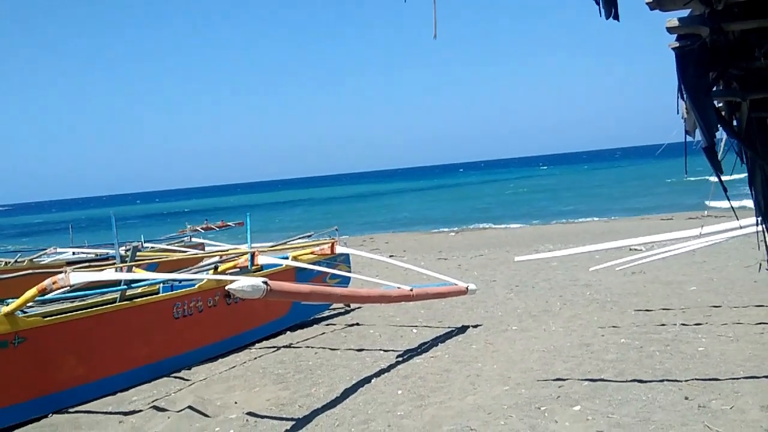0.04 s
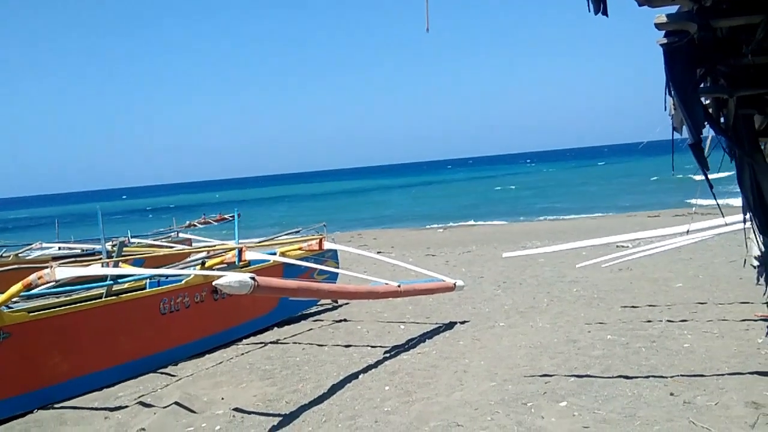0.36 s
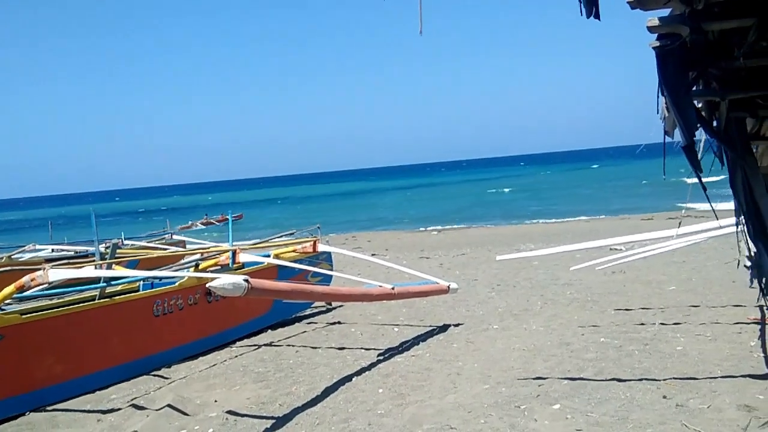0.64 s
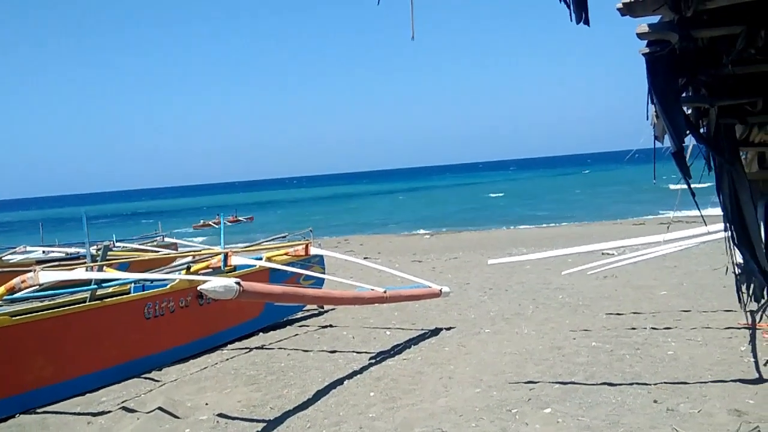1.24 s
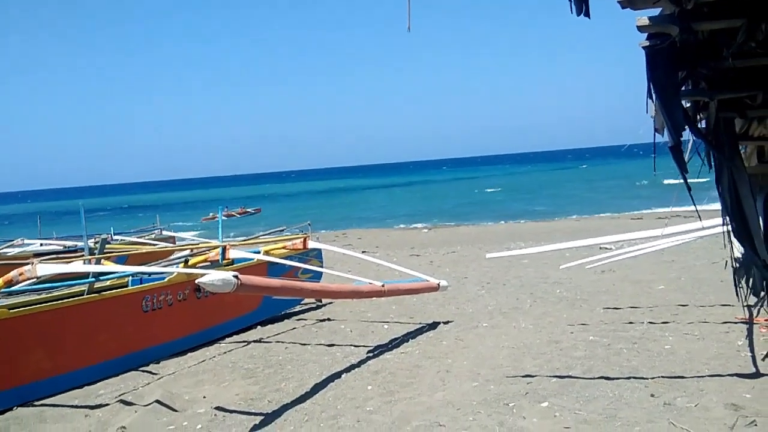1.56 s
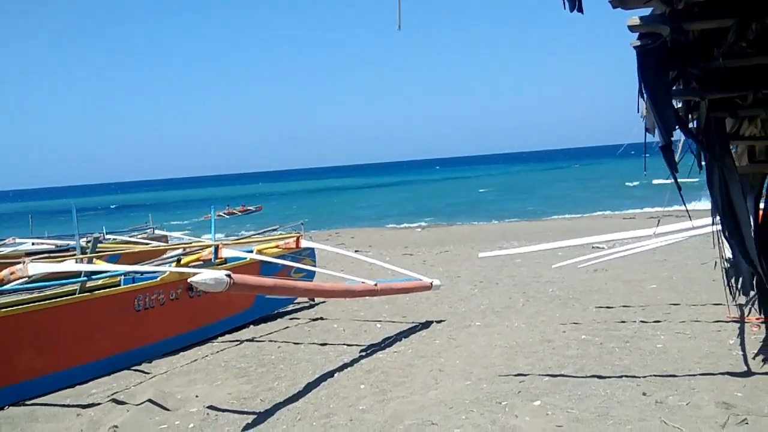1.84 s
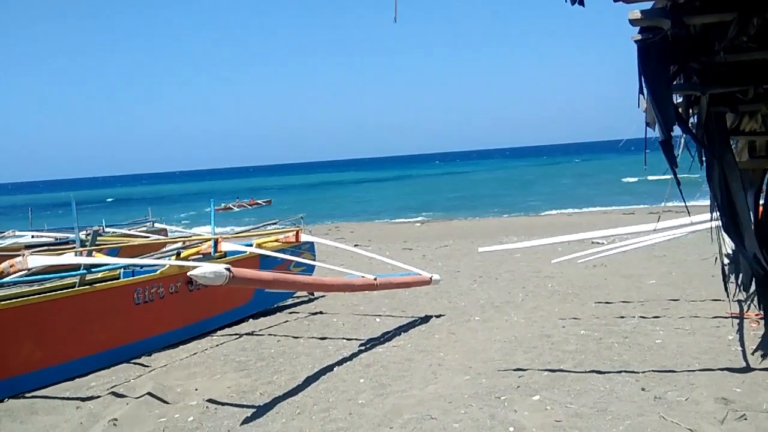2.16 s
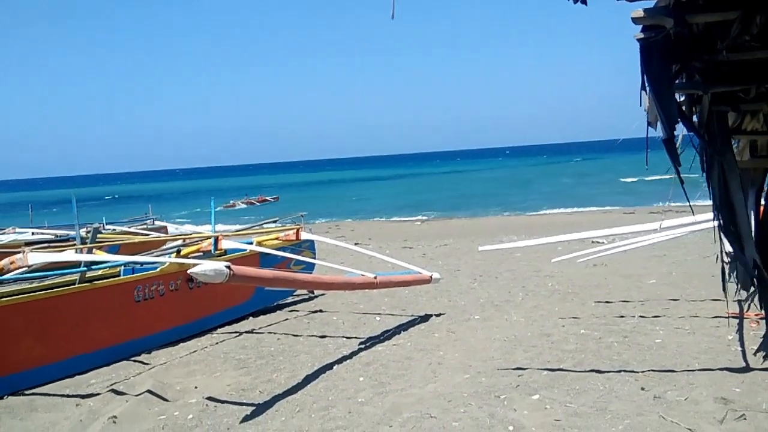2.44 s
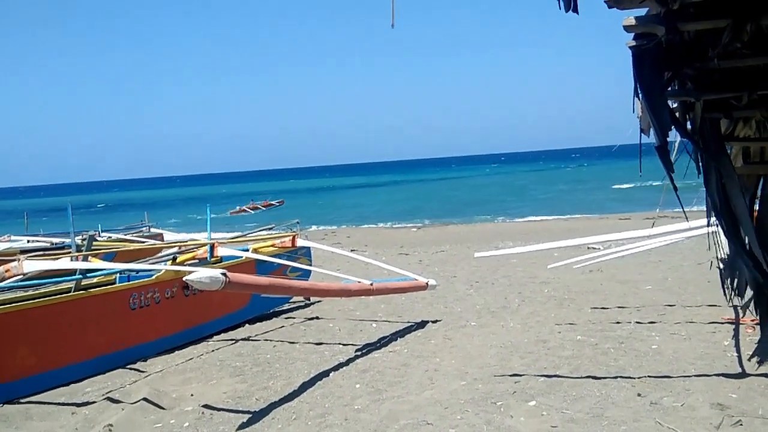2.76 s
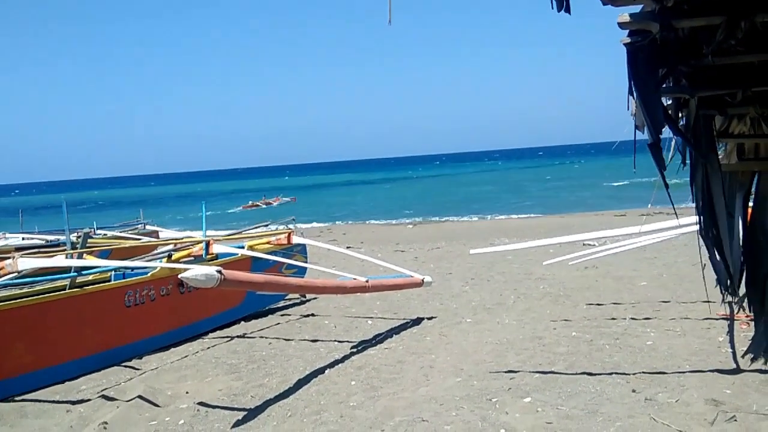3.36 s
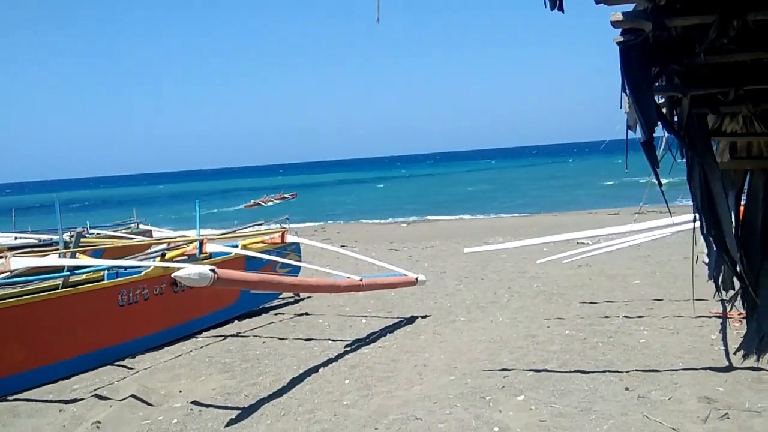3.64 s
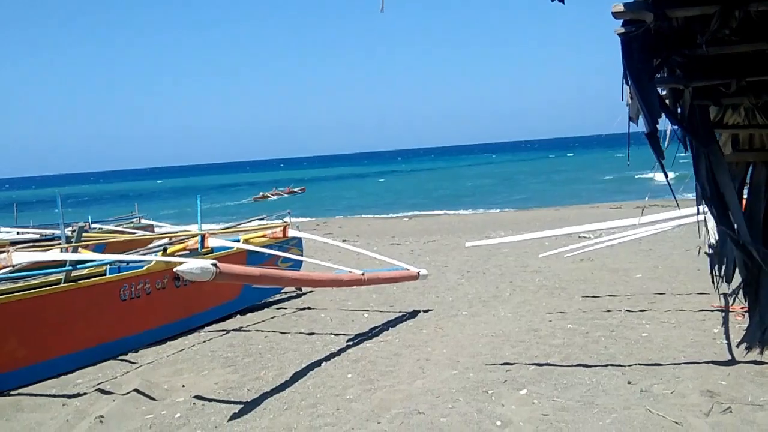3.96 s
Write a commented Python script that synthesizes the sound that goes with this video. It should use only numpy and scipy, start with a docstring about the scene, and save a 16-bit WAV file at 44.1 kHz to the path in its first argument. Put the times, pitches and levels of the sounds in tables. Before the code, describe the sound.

Gusty wind thumps on the microphone at a beach, with surf and light, rapid puttering.

```python
"""Gusts buffet the microphone on a windy beach, over a steady wash of surf.
Something light, probably spinning in the wind nearby, rubs once a turn: a dry puttering that
swells twice and slows down. Fine ticks, probably blown sand, strike close by.
Near the end come a faint squeak and one light wooden knock."""
import sys
import numpy as np
from scipy import signal
from scipy.fft import rfft, irfft
from scipy.io import wavfile
from scipy.ndimage import uniform_filter1d

SR = 44100
rng = np.random.default_rng(int(sys.argv[2]) if len(sys.argv) > 2 else 0)


def wav_out(sig):
    """Save sig, one row per channel (or a flat mono array), as 16-bit PCM at SR to the path in sys.argv[1]."""
    wavfile.write(sys.argv[1], SR, np.round(np.clip(np.atleast_2d(sig).T, -1, 1) * 32767).astype(np.int16))


N = 176400
TIME = np.arange(N) / SR


def from_db(db):
    """Decibels to gain."""
    return 10 ** (np.asarray(db) / 20)


def rms_one(x):
    """Scale to unit rms."""
    return x / np.sqrt(np.mean(x ** 2) + 1e-20)


def evened(x, seconds):
    """Ride the level of a noise so that it stays near rms 1 over short stretches."""
    size = max(int(seconds * SR), 2)
    power = uniform_filter1d(uniform_filter1d(rms_one(x) ** 2, size), size)
    return rms_one(x) / np.sqrt(power + 1e-3)


def in_time(rows):
    """Draw an automation curve through (time_s, value) rows."""
    return np.interp(TIME, *np.transpose(rows))


def at_hz(spectrum, hz):
    """Read (freq_hz, level_db) rows on a log-frequency axis."""
    freq_hz, level_db = np.transpose(spectrum)
    return np.interp(np.log(hz), np.log(freq_hz), level_db)


def band(x, low_hz, high_hz):
    """Gentle band-pass."""
    return signal.sosfilt(signal.butter(2, [low_hz, high_hz], "band", fs=SR, output="sos"), x + 1e-18)


def noise_band(low_hz, high_hz):
    """A steady band of noise at rms 1."""
    return rms_one(band(rng.standard_normal(N + SR // 2), low_hz, high_hz)[-N:])


def resonate(x, hz, width_hz):
    """Pass a signal through one resonance."""
    radius = np.exp(-np.pi * width_hz / SR)
    return signal.lfilter([1, 0, -1], [1, -2 * radius * np.cos(2 * np.pi * hz / SR), radius ** 2], x)


def clicks(rows):
    """One impulse for each (start_s, level_db) row."""
    start_s, level_db = np.transpose(rows)
    impulses = np.zeros(N)
    impulses[(start_s * SR).astype(int)] = from_db(level_db)
    return impulses


def wind(chop_db=4, flutter_db=3.5, eddy_hz=320, swing_per_octave=0.3):
    """Choppy gusts hit the microphone: deep thumps, and spurts of small eddies, brighter when strong."""
    # Strength of the deep buffeting: time_s, level_db
    deep_gusts = [(0.0, -3.5), (0.04, -31), (0.1, -13), (0.14, -43), (0.18, -20.5), (0.26, -22.5),
                  (0.29, -47), (0.32, -19), (0.41, -27), (0.46, -13), (0.54, -40), (0.6, -18),
                  (0.65, -37.5), (0.78, -20), (0.89, -40.5), (0.91, -22.5), (0.97, -16), (1.02, -28.5),
                  (1.11, -25.5), (1.16, -35), (1.19, -21.5), (1.3, -11), (1.35, -27), (1.39, -19),
                  (1.43, -27.5), (1.51, -29.5), (1.54, -17.5), (1.56, -26.5), (1.7, -18), (1.74, -38.5),
                  (1.83, -17), (1.87, -27.5), (1.97, -22), (2.02, -32), (2.25, -33), (2.27, -22),
                  (2.31, -34), (2.41, -19), (2.45, -34.5), (2.51, -20), (2.53, -21), (2.73, -26.5),
                  (2.76, -17.5), (2.83, -31.5), (2.86, -17.5), (2.9, -32.5), (2.95, -14.5), (2.99, -20.5),
                  (3.33, -23), (3.39, -17.5), (3.42, -24), (3.46, -20), (3.51, -27.5), (3.68, -12.5),
                  (3.71, -23.5), (3.75, -9.5), (3.79, -23.5), (3.91, -32.5), (3.94, -20), (4.0, -29)]
    # Strength of the small eddies: time_s, level_db
    small_gusts = [(0.0, -38), (0.03, -59), (0.09, -28.5), (0.13, -56), (0.18, -40.5), (0.3, -46),
                   (0.32, -28.5), (0.34, -56), (0.37, -31), (0.39, -46), (0.48, -27.5), (0.51, -59),
                   (0.61, -42), (0.69, -55.5), (0.79, -32), (0.81, -60), (0.99, -32), (1.02, -45),
                   (1.18, -49), (1.2, -13.5), (1.24, -39), (1.3, -23.5), (1.34, -51), (1.39, -39),
                   (1.44, -52), (1.57, -52), (1.59, -30.5), (1.63, -42), (1.67, -33.5), (1.74, -47.5),
                   (1.86, -35.5), (2.1, -52), (2.37, -46), (2.39, -35.5), (2.43, -42), (2.78, -42),
                   (2.81, -66), (2.86, -30), (2.88, -55), (2.95, -33.5), (3.0, -45), (3.01, -34),
                   (3.2, -38), (3.27, -29), (3.33, -47), (3.38, -23), (3.42, -50), (3.44, -24), (3.55, -52),
                   (3.59, -30.5), (3.69, -25), (3.71, -42), (3.74, -21.5), (3.78, -46.5), (3.98, -39),
                   (4.0, -63)]
    # Tone of the buffeting: freq_hz, density_db
    spectrum = [(25, -22), (35, -35), (50, -17), (70, 1), (105, 4.5), (160, -5), (250, -9.5), (350, -10.5),
                (480, -23), (680, -47.5), (950, -51.5), (1400, -58.5)]
    chop = chop_db * evened(noise_band(11, 26), 0.049)
    flutter = flutter_db * noise_band(26, 90)
    # A floor keeps the lulls alive; the offset puts a firm gust at 0 dB.
    deep_db = np.maximum(in_time(deep_gusts), -34) + 20.5 + chop
    small_db = np.maximum(in_time(small_gusts), -51) + 33 + chop + flutter
    edges_hz = 25 * 2 ** (np.arange(13) / 2)  # half octaves
    deep, small = 0, 0
    for low, high in zip(edges_hz, edges_hz[1:]):
        hz = np.sqrt(low * high)
        eddies = from_db(at_hz(spectrum, hz)) * np.sqrt(high - low) * noise_band(low, high)
        if hz < eddy_hz:
            deep += eddies
        else:
            small += eddies * from_db(np.log2(hz / eddy_hz) * swing_per_octave * small_db)
    thumps = band(from_db(deep_db - 22) * evened(deep, 0.022), 42, 2000)
    spurts = from_db(small_db - 35) * evened(small, 0.013)
    return thumps + spurts


def surf(gain_db=-51):
    """Distant waves blur into a smooth wash that swells slowly."""
    # Tone of the surf: freq_hz, density_db
    spectrum = [(30, -2), (90, 3), (250, -15), (500, -5), (900, -0.5), (1300, 2), (1700, 2), (2100, 1),
                (2550, -1), (2990, 2), (3400, -2.5), (4000, -5), (5000, -7), (7400, -7.5), (9000, -12.5),
                (12900, -28.5), (15500, -25)]
    # Rise and fall of the surf: time_s, level_db
    swell = [(0, 1), (.6, -0.2), (1.4, 2), (2, 1.5), (3, 0), (3.5, 0.5), (4, 0.5)]
    hz = np.maximum(np.arange(N // 2 + 1) * SR / N, 1)
    wash = irfft(rfft(rng.standard_normal(N)) * from_db(at_hz(spectrum, hz)), N)
    wash /= np.std(band(wash, 1000, 9000))  # the hiss sets the level
    return wash * from_db(gain_db + in_time(swell))


def spinner(gain_db=-36, rub_width_s=0.0021, tail_db=-5.5, tail_s=0.018, shimmer_db=3):
    """Once a turn a short dry rub excites the resonances; nearby surfaces add a brief tail."""
    # Speed of the spin: time_s, turns_per_s
    spin = [(0, 19.636), (0.6, 19.76), (1.65, 19.875), (2.1, 18.687), (2.6, 16.906), (3.3, 15.522),
            (4, 15.247)]
    # How hard it rubs: time_s, level_db
    rub_strength = [(.02, -45), (.07, -42), (.12, -47), (.23, -45), (.33, -50), (.58, -49), (.63, -41),
                    (.73, -35.5), (.83, -43), (.98, -40.5), (1.04, -36), (1.19, -31), (1.34, -34),
                    (1.54, -35), (1.59, -41), (1.69, -44), (1.84, -40), (1.95, -44), (2.02, -50),
                    (2.16, -54), (2.27, -49), (2.44, -50), (2.5, -44), (2.73, -37), (2.79, -39.5),
                    (2.91, -38.5), (2.98, -47), (3.16, -50), (3.23, -45), (3.29, -50), (3.62, -49),
                    (3.72, -46), (3.85, -56)]
    # Resonances of its body: pitch_hz, width_hz, fast_db, slow_db, swing (dB per dB of rub)
    modes = [(2108, 320, -9.5, -4.5, 0.56), (3007, 440, -9.5, -8.5, 0.57), (3590, 430, -9, -18, 0.96),
             (3984, 290, -6, -2.5, 1), (4305, 420, -8, -13, 0.88), (5640, 780, -10.5, -13, 1.03),
             (6320, 340, -11.5, -7.5, 0.9), (6490, 320, -11, -24, 0.81), (7000, 270, -6.5, -12, 1.02),
             (7600, 110, -9, -11.5, 0.94), (8070, 1500, -9, -7.5, 0.83), (9830, 300, -16.5, -19, 1.3),
             (11150, 1900, -18, -18, 0.72)]
    speed = in_time(spin)
    turns = 0.574 + np.cumsum(speed) / SR
    since_rub_s = (turns - np.round(turns)) / speed  # negative just ahead of a rub
    rub = np.exp(-0.5 * (since_rub_s / rub_width_s) ** 2)
    tail = from_db(tail_db) * (since_rub_s > 0) * np.exp(-np.abs(since_rub_s) / tail_s)
    force_db = in_time(rub_strength) + 31.5  # near 0 at the hardest rub
    slowness = np.interp(speed, [18, 19.8], [1, 0])
    body = 0
    for hz, width_hz, fast_db, slow_db, swing in modes:
        ringing = resonate(rng.standard_normal(N), hz, width_hz)
        ringing = evened(resonate(ringing, hz, width_hz), 0.0056)  # twice, for steeper skirts
        tone_db = fast_db + slowness * (slow_db - fast_db)
        shimmer = shimmer_db * evened(noise_band(4.7, 14), 0.11)
        body += ringing * from_db(tone_db + swing * force_db + shimmer)
    return from_db(gain_db) * band(np.hypot(rub, tail) * body, 1670, 10800)


def sand(grains_per_s=40, faint_db=-49, spread_db=3, rise_s=0.0005, decay_s=0.0015):
    """Grains strike in a few clear ticks and a sprinkle of faint ones, each a tiny bright crack."""
    # The clear grain hits: start_s, level_db
    ticks = [(.174, -37), (.709, -32), (1.110, -31), (1.458, -36), (1.967, -34.5), (2.052, -45),
             (2.207, -42), (2.269, -40), (2.316, -40), (2.600, -36), (2.683, -35), (2.759, -36),
             (3.701, -39)]
    lands = rng.random(N) < grains_per_s / SR
    sprinkle = lands * from_db(faint_db + spread_db * np.clip(rng.standard_normal(N), -2, 2))
    hits = clicks(ticks) + sprinkle + 1e-18
    decays = signal.lfilter([1], [1, -np.exp(-1 / (decay_s * SR))], hits)
    envelope = uniform_filter1d(decays, int(rise_s * SR))
    return band(envelope * rng.standard_normal(N), 4500, 10500)


def squeak(peak_s=3.311, pitch_hz=1930, width_s=0.004, level_db=-39):
    """One faint, very short squeak on a pure tone."""
    envelope = np.exp(-((TIME - peak_s) / width_s) ** 2)
    return from_db(level_db) * envelope * np.sin(2 * np.pi * pitch_hz * TIME)


def knock():
    """Two light touches, close enough to make one knock, ring the modes of a wooden pole."""
    # Touches on the pole: start_s, level_db
    touches = [(3.482, -39), (3.491, -45)]
    # Modes of the wood: pitch_hz, level_db, t60_s
    modes = [(1120, -7, 0.084), (1380, 5, .045), (1917, 0, 0.074), (2280, -0.5, 0.14), (3000, 6, 0.022),
             (3550, -4, 0.027)]
    strikes = clicks(touches) + 1e-18
    wood = 0
    for pitch_hz, level_db, t60_s in modes:
        radius = from_db(-60 / (t60_s * SR))
        angle = 2 * np.pi * pitch_hz / SR
        ring = signal.lfilter([0, np.sin(angle)], [1, -2 * radius * np.cos(angle), radius ** 2], strikes)
        wood += from_db(level_db) * ring
    return wood


def scene():
    """All sources at one microphone."""
    return (wind() + surf() + spinner() + sand() + squeak() + knock())[None]


def record(dry, fade_s=0.006, cutoff_hz=15600):
    """A quick fade-in and a steep cut of the very top."""
    fade_in = np.sin(np.pi / 2 * np.minimum(TIME / fade_s, 1)) ** 2
    low_pass = signal.ellip(12, 0.1, 80, cutoff_hz, fs=SR, output="sos")
    return signal.sosfilt(low_pass, dry * fade_in)


dry = scene()
out = record(dry)
wav_out(out)
```